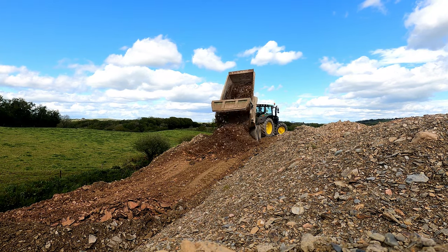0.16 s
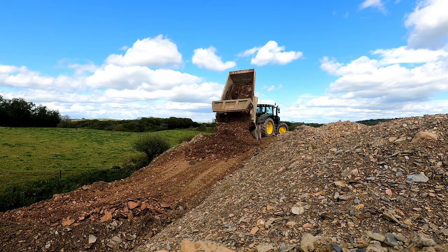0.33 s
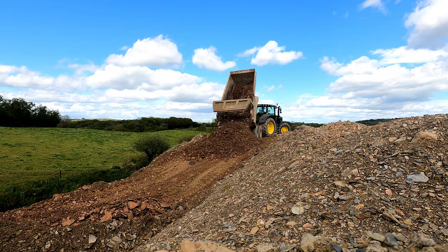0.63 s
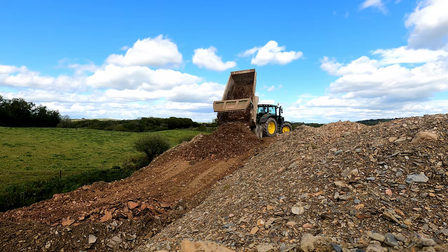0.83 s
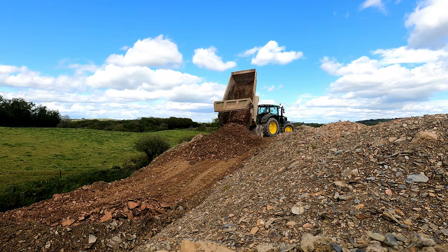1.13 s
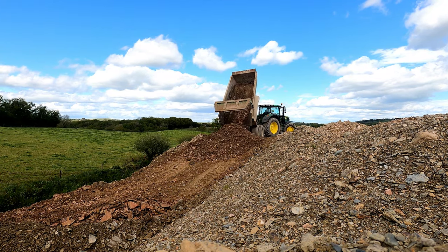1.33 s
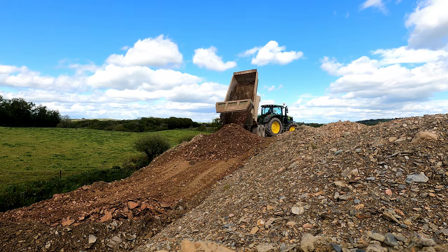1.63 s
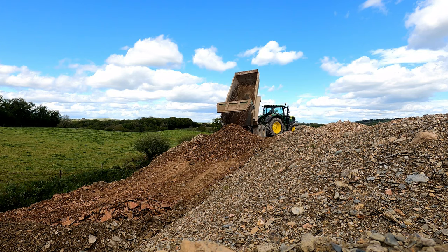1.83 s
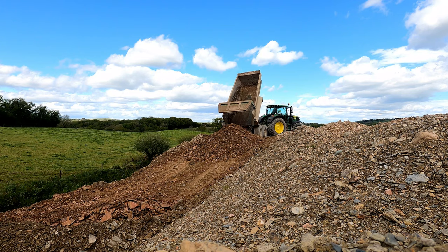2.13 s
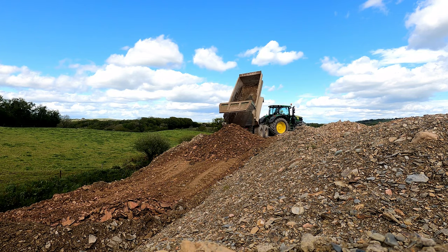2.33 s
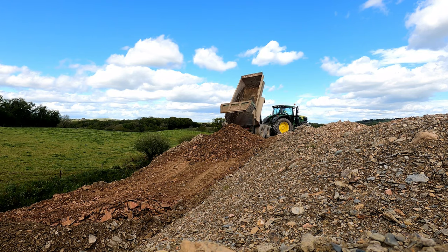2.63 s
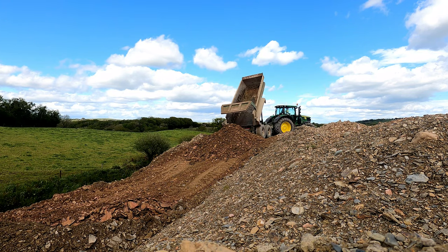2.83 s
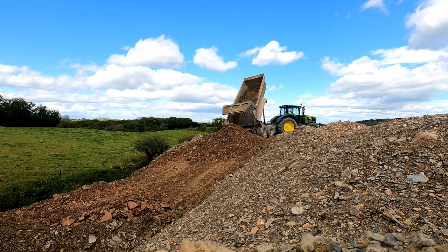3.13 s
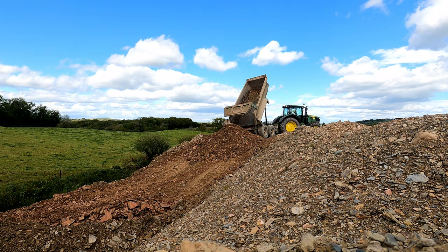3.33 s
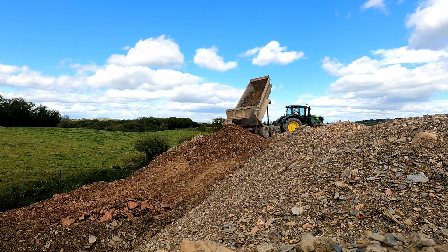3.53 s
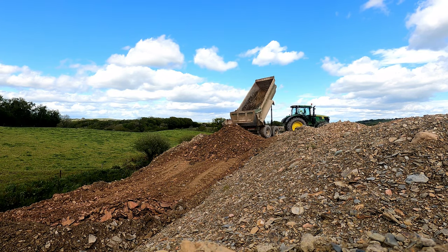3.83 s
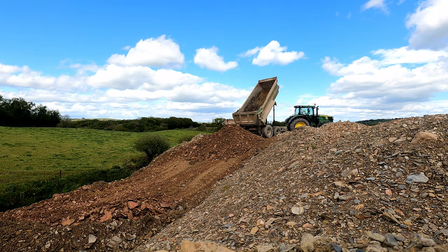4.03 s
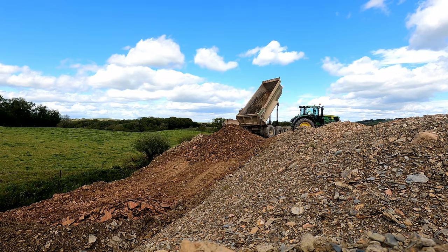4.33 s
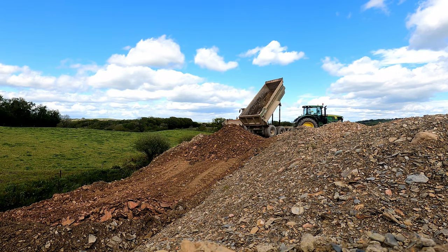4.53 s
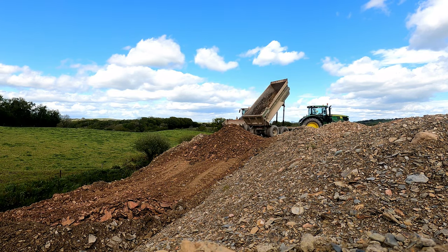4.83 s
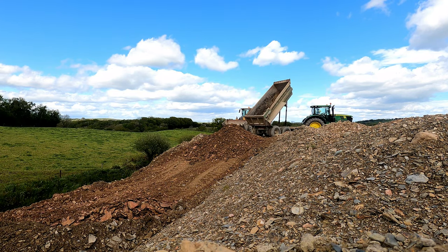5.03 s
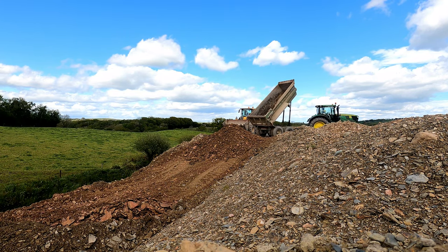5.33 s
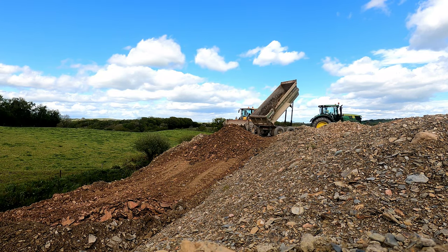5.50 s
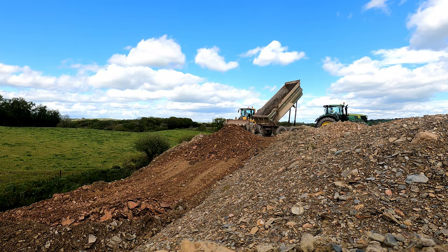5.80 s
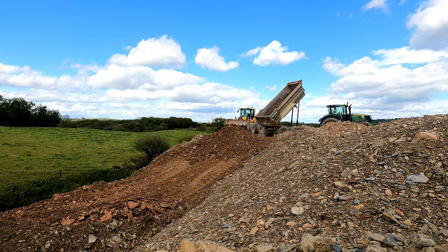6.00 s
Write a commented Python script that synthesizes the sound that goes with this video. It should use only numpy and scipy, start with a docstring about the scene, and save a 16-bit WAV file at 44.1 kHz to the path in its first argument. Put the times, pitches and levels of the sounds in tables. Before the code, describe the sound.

Outdoors, stones tumble from a tipping trailer over a diesel idle, thinning out before a short squeal, three ringing metal slams, rattles and rising engine revs.

```python
"""A spoil heap in the open: some way off, a raised steel trailer pours out the last of its rubble.
Stones are randomly struck resonances; hinge and idling tractor are sums of harmonics, the tractor with noise.
The trailer creeps forward, its hinge squeals and the gate slams three times, ringing the empty steel body.
Then the engine picks up and the trailer rattles. The image begins as a point ahead and opens out."""
import sys
import numpy as np
from scipy import signal
from scipy.fft import rfft, irfft, next_fast_len
from scipy.io import wavfile
from scipy.ndimage import uniform_filter1d, minimum_filter1d

SR = 44100
rng = np.random.default_rng(int(sys.argv[2]) if len(sys.argv) > 2 else 0)


def output_pcm(signal):
    """Save a mono or channel-first signal as 16-bit PCM at the path in sys.argv[1].

    Samples are clipped to [-1, 1] before scaling.
    """
    pcm = np.clip(np.atleast_2d(signal).T, -1, 1) * 32767
    wavfile.write(sys.argv[1], SR, np.round(pcm).astype(np.int16))


N = 271643
TIME = np.arange(N) / SR
BAND_HZ = 25 * 2 ** (np.arange(28) / 3)   # third-octave centres

# Flow of the load over the tail. Each row: time in seconds, level in dB.
FLOW = [(0, -1.5), (.7, -0.5), (1.2, -0.5), (1.75, -4.5), (2.25, -8), (2.8, -22), (3.25, -33)]
# Spectra of heavy stones, hard stones and fine grit. Each row: frequency in Hz, relative level in dB per Hz.
THUDS = [(90, 7), (130, 1), (190, -9), (250, 6), (340, 1), (480, 2.5), (660, 2.5), (800, -9), (1000, -6)]
CLACKS = [(850, 9), (1000, 0), (1250, 4), (1580, 8), (2000, 5.5), (2400, -1), (2950, -22), (3400, -17.5),
          (3900, -36)]
GRIT = [(2500, 3), (3400, -0.5), (4000, -9), (4800, -12), (6300, -14.5), (8000, -20.5), (10000, -28.5),
        (11300, -36.5), (12200, -47), (14500, -41)]
# Rocks landing, and now and then a small pebble ticking. Each row: start in seconds, level in dB, pitch in Hz,
# t60 in seconds.
ROCKS = [(.065, -26.5, 1700, 0.12), (.368, -27, 2300, 0.19), (.445, -24, 1500, 0.13),
         (.672, -21, 593, 0.12), (.792, -35, 6000, .05), (.845, -24, 1500, .1), (1.297, -26, 1890, 0.12),
         (1.345, -21.5, 750, 0.075), (1.545, -24, 790, 0.14), (1.565, -28, 1900, 0.11),
         (1.662, -22.5, 1590, 0.18), (1.684, -22, 650, 0.095), (1.835, -31, 1860, 0.16),
         (2.012, -29.5, 1830, 0.14), (2.118, -31, 1720, 0.35), (2.203, -32, 1800, 0.077),
         (2.25, -44, 2200, 0.1), (2.323, -33, 2100, 0.24), (2.42, -27.5, 1850, 0.14),
         (2.445, -39, 6000, .06), (2.563, -32.5, 2060, 0.17), (2.825, -39, 1800, .2),
         (2.995, -32, 1170, .15)]
# Boulders booming on the steel floor as they slide out. Each row: start in seconds, level in dB,
# pitch in Hz, t60 in seconds.
BOULDERS = [(.57, -18.5, 470, 0.14), (.672, -14.5, 340, 0.09), (.75, -22.5, 126, 0.32),
            (.81, -24, 245, 0.21), (.905, -23, 676, 0.24), (1.558, -1.5, 252, 0.066), (1.69, -23, 517, 0.1)]
THUD_DB, CLACK_DB = -26.5, -31.5   # before the flow level is added
GRIT_DB, CHURN_DB = -35.5, -31     # at the start; the fine stuff then thins out steadily
THINS_FROM_S, GRIT_DB_PER_S, CHURN_DB_PER_S = 0.47, 7, 6.5

# Tailgate blows, in three slams. Each row: start in seconds, level in dB, boom in dB, boom pitch in Hz,
# treble crack in dB, loss at each rebound in dB, side panels in dB, clang pitch in Hz, clang in dB,
# long ring of the body in dB.
SLAMS = [(3.383, -19.5, 5, 756, -11, 15.5, -10, 754, 5, 0.5),
         (3.390, -24, -2.5, 400, -1, 10.5, -4, 1850, 13.5, -4),
         (3.416, -23, 7.5, 300, -7, 10, -2.5, 2000, 11.5, 5.5),
         (3.465, -19.5, 8.5, 133, -4, 7.5, -3.5, 1750, 9, -1),
         (3.525, -29.5, 7, 320, -2, 12, -0.5, 1810, 15, -7),
         (3.63, -32.5, 20.5, 238, -8.5, 6.5, -6, 2090, 14, 6),
         (3.897, -21.5, 6.5, 427, -4.5, 9, -9.5, 677, 5, 10),
         (3.925, -31.5, 4.5, 739, -13, 11, -5, 684, 7.5, 0),
         (4.646, -17, -0.5, 141, 5.5, 1, 1, 3600, 5.5, -4), (4.66, -28, -0.5, 400, 5, 8, 1, 2400, 3, -2),
         (4.678, -18.5, 6, 240, -2.5, 11, 0, 2900, 3.5, 1),
         (4.706, -22.5, 10.5, 145, 3, 6.5, 6.5, 3400, 10, 3.5),
         (4.747, -20.5, 11.5, 140, 0, 5.5, 0, 1050, 5, 4), (4.775, -17, -3, 200, -3.5, 4, 7.5, 1150, 3, 5),
         (4.812, -19.5, 6, 127, 1, 12, 1, 1550, 5.5, -2), (4.835, -19, 5, 151, 2.5, 15, 1, 4400, 6.5, -5),
         (4.863, -24, -5, 300, 0, 17, 5.5, 3500, 0, -5),
         (4.934, -26.5, 4.5, 450, -6.5, 16, 6.5, 1090, 5, 7)]
# Dense ringing of the steel body. Each row: frequency in Hz, relative level in dB per Hz.
BODY = [(40, 9.5), (80, 7.5), (140, 4.5), (200, -4), (290, -1), (450, 3), (700, -3), (1050, -3.5),
        (1500, -15), (1950, -9), (2600, -14.5), (3600, -6.5), (4500, -26.5), (6000, -16.5), (8000, -85),
        (14000, -87)]
# How long that ringing lasts. Each row: frequency in Hz, t60 in seconds.
BODY_T60 = [(60, 0.38), (150, 0.97), (400, 0.59), (850, 0.63), (1270, 0.49), (1650, .38), (2000, 0.36),
            (4000, 0.095), (10000, .08)]
# Clearest modes of the body, then the gate's own. Each row: frequency in Hz, relative level in dB,
# t60 in seconds.
MODES_OF_BODY = [(122, -10, .65), (139, -11, .7), (153, -8.5, .75), (183, -19.5, 1.4), (248, -15, .9),
                 (291, -14, 1.05), (404, -16, 1.35), (472, -17, .9), (502, -20, 1.0), (590, -19, .8),
                 (651, -17, .6), (953, -20, .7), (1030, -21, .7), (1104, -24, .9), (1190, -26, .8),
                 (1355, -27, 1.1), (1513, -30, .9)]
MODES_OF_GATE = [(690, -10, .25), (835, -12, .22), (1050, -14, .2), (1330, -19, .2), (1630, -19, .2),
                 (1720, -21, .2), (1815, -18, .2), (1945, -20, .2), (2137, -18, .2), (2240, -20, .2),
                 (2380, -20, .18), (2500, -20, .2), (2620, -18, .18), (2800, -21, .18), (2945, -19, .16),
                 (3160, -21, .14), (3450, -19, .15), (3650, -19, .15), (3810, -21, .16), (4310, -26, .14),
                 (4490, -25, .16), (5330, -31, .14), (5750, -31, .14), (6230, -35, .12)]
# After each blow the gate rebounds, duller and boomier each time before the loss of level.
REBOUND_S, REBOUND_DULLS_DB, REBOUND_BOOM_DB = .034, 5.5, 3.5
BODY_HZ, BOOM_SINK = 142, 0.49   # the boom sinks towards this pitch; share of the interval lost per rebound
# The side panels ring in one range; where the gate lands decides which of its modes clang most.
PANEL_HZ, PANEL_OCTAVES, CLANG_OCTAVES = 1250, 0.2, 0.28

# Overtones of the hinge's squeal. Each row: frequency in Hz, level in dB.
HINGE = [(730, -2), (1460, -26), (2200, -15.5), (2950, -7), (3700, -16), (4400, -27), (5900, -31),
         (6600, -41), (8000, -39), (10000, -45), (15000, -60)]
# The squeal swells to a peak, holds briefly and dies away while its pitch sags.
SQUEAL_PEAK_S, SQUEAL_HOLD_S, SQUEAL_DB = 3.285, .018, -20
SQUEAL_RISE_DB_PER_S, SQUEAL_FALL_DB_PER_S = 800, 650
SQUEAL_HZ, SQUEAL_BEND_HZ, SQUEAL_BEND_S = 728, 14, .012

# Loudest rattles of drawbar and latches. Each row: start in seconds, level in dB, pitch in Hz, t60 in seconds.
RATTLES = [(3.552, -37, 1900, 0.11), (4.140, -36, 2550, 0.25), (5.122, -34.5, 1530, 0.13),
           (5.241, -30.5, 2360, 0.16), (5.246, -37.5, 1130, 0.47), (5.548, -40.5, 2530, 0.33),
           (5.755, -45, 2590, 0.12), (5.838, -38, 2400, 0.076), (5.9, -52, 2400, .12),
           (5.947, -28.5, 2930, 0.15), (5.971, -30.5, 1090, 0.37), (6.017, -23.5, 1040, 0.45),
           (6.024, -28, 2270, 0.18), (6.028, -27, 490, 0.17), (6.055, -24.5, 540, 0.22)]
# The drawbar's modes. Each row: frequency in Hz, relative level in dB, t60 in seconds.
MODES_OF_DRAWBAR = [(410, -3, .35), (497, 0, .35), (700, -7, .25), (1060, -5, .3), (1170, -4, .3),
                    (1340, -2, .3), (1440, -4, .25), (2010, -5, .18), (2330, -6, .16), (2640, -5, .16),
                    (2900, -8, .14), (3130, -8, .14), (3560, -10, .12)]
# Clinks of pins and chain. Each row: start in seconds, level in dB, pitch in Hz, t60 in seconds.
CLINKS = [(3.467, -43, 6040, 0.14), (3.549, -28.5, 3380, 0.07), (4.098, -44, 3780, 0.066),
          (4.158, -36, 3930, 0.073)]
# Gravel crunching under the tyres. Each row: start in seconds, level in dB, pitch in Hz, t60 in seconds.
CRUNCHES = [(5.06, -48, 4100, 0.28), (5.095, -47, 5653, 0.096), (5.32, -51, 3990, .15),
            (5.5, -55, 5200, .3), (5.565, -45, 3600, .12), (5.7, -45, 3300, 0.11), (5.825, -46, 4670, 0.12),
            (5.943, -41, 4800, 0.09), (6.07, -42.5, 4750, .03)]

# The diesel's speed. Each row: time in seconds, firings per second.
SPEED = [(0, 35.4), (3.1, 35.3), (3.48, 33.8), (3.9, 36.0), (4.5, 34.9), (5.0, 34.8), (5.35, 32.9),
         (5.69, 35.7), (5.78, 37.3), (5.92, 40.5), (6.16, 45.9)]
# Higher exhaust orders. Each row: multiple of the firing rate, level in dB.
OVERTONES = [(1.5, -39), (2.5, -51.5), (3, -58), (3.5, -46.5), (4, -50.5), (5, -65)]
# The exhaust note sinks and recovers during the pour. Each row: time in seconds, level in dB.
EXHAUST_LEVEL = [(.5, 0.5), (1.25, -13), (1.7, -1), (3.3, -0.5), (4.2, -4), (4.7, 0.5), (5.3, -0.5)]
# Spectra of low rumble and of clatter. Each row: frequency in Hz, relative level in dB per Hz.
RUMBLE = [(20, -10.5), (35, 5.5), (52, -1.5), (80, -4.5), (130, -5.5), (190, -9), (320, -17.5), (600, -30)]
CLATTER = [(250, 9.5), (370, -1.5), (475, 6), (600, 7), (1000, 3), (1400, 1.5), (1800, -3.5), (2700, -7.5),
           (3600, -9.5), (4400, -17), (6200, -24.5), (8000, -37), (14000, -46.5)]
# The rumble is strong under the pour and while the trailer creeps forward.
# Each row: time in seconds, level in dB.
RUMBLE_LEVEL = [(0, -42), (.8, -23.5), (2.7, -35), (3.8, -24.5), (4.6, -28.5), (5.3, -46.5), (5.85, -35.5)]
# Changes in the engine's clatter. Each row: time in seconds, level in dB.
CLATTER_LEVEL = [(3.0, -0.5), (3.85, 1), (4.35, -1), (4.47, 1), (5.3, 2.5), (5.6, -2), (5.85, 2)]
# Engine at idle: firing rate, then levels of firing tone, octave and clatter before their own curves.
IDLE_HZ, TONE_DB, OCTAVE_DB, CLATTER_DB = 35.48, -28.5, -32, -44
# Change for each extra firing per second.
TONE_DB_PER_HZ, OCTAVE_DB_PER_HZ, CLATTER_DB_PER_HZ = 2, -0.1, 0.9
FULL_EFFORT_HZ = 38.5   # effort stops rising above this firing rate

# The image is a point at first and then opens. Each row: time in seconds, level of the side signal in dB.
WIDTH = [(0, -64), (3.55, -56), (3.9, -21.5), (4.2, -16.5), (4.7, -14), (6.16, -8.5)]
CUTOFF_HZ = 16000


def rubble(surge_db=1.5, run_out_db_per_s=45):
    """The load slides off the floor and tumbles onto the heap, in small surges."""
    flow_db, = in_time(FLOW)
    thinning_s = np.maximum(TIME - THINS_FROM_S, 0)
    run_out_s = np.maximum(TIME - FLOW[-1][0], 0)
    surges = from_db(surge_db * drift(2.6) - run_out_db_per_s * run_out_s)

    thuds = coloured(grains(per_s=900, low_hz=122.0, high_hz=970, cycles=5.3, spread_db=1.5), THUDS)
    clacks = coloured(grains(per_s=900, low_hz=804, high_hz=3600, cycles=7.2, spread_db=0.0), CLACKS)
    coarse = from_db(flow_db) * (from_db(THUD_DB) * thuds + from_db(CLACK_DB) * clacks)

    grit = coloured(grains(per_s=4000, low_hz=2110, high_hz=12000, cycles=7, spread_db=-0.9), GRIT)
    churn = coloured(rng.standard_normal(N), CLATTER)   # gravel, with the same spectrum as the clatter
    fine = from_db(GRIT_DB - GRIT_DB_PER_S * thinning_s) * grit
    fine += from_db(CHURN_DB - CHURN_DB_PER_S * thinning_s) * churn

    rocks = knocks(ROCKS, width_octaves=0.78, rise_s=0.0079, top_hz=8050, tail_db=-39)
    boulders = knocks(BOULDERS, width_octaves=0.41, rise_s=0.011, top_hz=3000, tail_db=-42)
    return surges * (coarse + fine) + rocks + boulders


def tailgate(boom_octaves=0.69, knee_hz=850, treble_hz=2300, build_cycles=0.85, contact_s=0.011,
             judder_db=2, modes_db=-3, strike_db=-2, strike_t60=0.023, strike_rise_s=.003,
             top_hz=9000, air_hz=7600):
    """Each blow rings the steel body: the gate clangs in beating pairs of modes, the boom builds and lasts."""
    columns = np.transpose(rebounds(count=4))
    times, level_db, boom_db, boom_hz, crack_db, panel_db, clang_hz, clang_db, ring_db = columns
    crack_curve = [(knee_hz, 0), (treble_hz, 1), (2 * treble_hz, 1), (top_hz, .2)]

    def force_db(hz):
        """Strength of every blow at one frequency."""
        boom = boom_db * bump(hz, boom_hz, boom_octaves)
        panels = panel_db * bump(hz, PANEL_HZ, PANEL_OCTAVES)
        return level_db + boom + panels + crack_db * at_hz(crack_curve, hz)

    # Dense ringing: the power envelope of each band shapes a band of noise.
    out, bite = np.zeros(N), np.exp(-1 / (strike_rise_s * SR))
    for hz, share in zip(BAND_HZ, shares(at_hz(BODY, BAND_HZ))):
        keep, keep_strike = from_db(-120 / (np.array([at_hz(BODY_T60, hz), strike_t60]) * SR))
        build = np.exp(-1 / ((contact_s + build_cycles / hz) * SR))
        blows = clicks(times, from_db(force_db(hz)) ** 2)
        boom = signal.lfilter([1], [1, -keep], blows)
        boom = signal.lfilter([1 - build], [1, -build], boom)
        strike_power = from_db(strike_db) ** 2 * hz / (hz + knee_hz)
        strike = signal.lfilter([strike_power], [1, -keep_strike], blows)
        strike = signal.lfilter([1 - bite], [1, -bite], strike)
        out += share * np.sqrt(boom + strike) * noise_band(hz)
    out *= from_db(judder_db * drift(49))   # the loose gate chatters on its frame

    for hz, mode_db, t60 in MODES_OF_BODY:
        uneven_db = rng.normal(0, 1.5, len(times))
        strengths = from_db(force_db(hz) + modes_db + ring_db + mode_db + uneven_db)
        out += ring(clicks(times, strengths * rng.choice([-1, 1], len(times))), hz, t60)
    for hz, mode_db, t60 in MODES_OF_GATE:
        clang = clang_db * bump(hz, clang_hz, CLANG_OCTAVES)
        for twin_hz in (hz * .994, hz * 1.006):
            uneven_db = rng.normal(0, 1.5, len(times))
            strengths = from_db(force_db(hz) + clang + mode_db - 3 + uneven_db)
            late_s = rng.uniform(0, .0035, len(times))
            out += ring(clicks(times + late_s, strengths), twin_hz, t60)
    return signal.sosfilt(signal.butter(4, min(air_hz, SR / 3), fs=SR, output="sos"), out)


def rebounds(count):
    """Each blow and its ever weaker, duller returns, as rows like SLAMS without the loss per rebound."""
    kept = np.clip(1 - BOOM_SINK, 0, 1)
    rows = []
    for s, db, boom_db, hz, crack_db, loss_db, *colour, ring_db in SLAMS:
        for k in range(count):
            boom_hz = BODY_HZ * (hz / BODY_HZ) ** (kept ** k)
            rows.append((s + k * REBOUND_S, db - k * loss_db, boom_db + k * REBOUND_BOOM_DB, boom_hz,
                         crack_db - k * REBOUND_DULLS_DB, *colour, ring_db - k * REBOUND_BOOM_DB))
    return rows


def hinge(panel_hz=1470, panel_t60=0.15, panel_db=16, panel_lag_s=0.018, floor_db=-15, floor_lag_s=.04,
          wall_db=-12, wall_lag_s=0.029, wall_hz=850, rasp_db=3):
    """The dry pin sticks and slips unevenly; a panel answers near its octave, floor and far wall echo it."""
    age = TIME - SQUEAL_PEAK_S
    hz = SQUEAL_HZ + SQUEAL_BEND_HZ * (1 - np.tanh(age / SQUEAL_BEND_S)) / 2
    rise_db = SQUEAL_RISE_DB_PER_S * age
    fall_db = -SQUEAL_FALL_DB_PER_S * np.maximum(age - SQUEAL_HOLD_S, 0)
    level_db = SQUEAL_DB + np.minimum(rise_db, fall_db)
    uneven_hz = hz * (1 + .017 * drift(400) + .004 * drift(110))
    phase = 2 * np.pi * np.cumsum(uneven_hz) / SR
    tone = np.zeros(N)
    for k in range(1, 21):
        rasp = rasp_db * min(k / 4, 1) * drift(90)
        tone += from_db(at_hz(HINGE, k * SQUEAL_HZ) + rasp) * np.sin(k * phase)
    squeal = tone * from_db(level_db)
    panel = ring(squeal + 1e-18, panel_hz, panel_t60) * 2 * np.log(1000) / (panel_t60 * SR)
    # The wall's echo is duller than the floor's.
    dulled = signal.sosfilt(signal.butter(2, wall_hz, fs=SR, output="sos"), squeal + 1e-18)
    off_panel = echo(panel, panel_lag_s, panel_db)
    off_floor = echo(squeal, floor_lag_s, floor_db)
    off_wall = echo(dulled, wall_lag_s, wall_db)
    return squeal + off_panel + off_floor + off_wall


def loose_stones(level_db=-13, settle_t60=0.18, spread_db=3):
    """Stones left in the body jump at each hard blow and clatter on the steel until they settle."""
    times, blow_db, _, _, crack_db, *_ = np.transpose(SLAMS)
    keep = from_db(-120 / (settle_t60 * SR))
    kicks = clicks(times, from_db(blow_db + crack_db + level_db) ** 2)
    shaking = np.sqrt(signal.lfilter([1], [1, -keep], kicks))
    return shaking * grains(per_s=1100, low_hz=1550, high_hz=3750, cycles=69, spread_db=spread_db)


def drawbar(ring_db=-5, reach_octaves=0.81):
    """Each rattle is a flurry of contacts that rings the drawbar's modes near its own pitch."""
    times, level_db, pitch_hz, _ = np.transpose(RATTLES)
    out = from_db(-3.0) * knocks(RATTLES, width_octaves=1.34, rise_s=0.0047, top_hz=3400, tail_db=-25.0)
    for hz, mode_db, t60 in MODES_OF_DRAWBAR:
        uneven_db = rng.normal(0, 2, len(times))
        strengths = from_db(level_db + ring_db + mode_db + uneven_db) * bump(hz, pitch_hz, reach_octaves)
        out += ring(clicks(times, strengths * rng.choice([-1, 1], len(times))), hz, t60)
    return out


def pins_and_chain():
    """Small hard steel parts clink: knocks in a very narrow resonance."""
    return knocks(CLINKS, width_octaves=0.065, rise_s=0.0055, top_hz=9000, tail_db=-39.5)


def tyres_on_gravel():
    """Gravel crunches under the tyres: soft-edged knocks in a broad, high resonance."""
    return knocks(CRUNCHES, width_octaves=0.65, rise_s=.012, top_hz=6700, tail_db=-38)


def engine(throb=0.048, wobble_db=3.5):
    """Exhaust orders on the firing rate, with rumble, and clatter that swells slightly at each firing."""
    (rate,), (rumble_db,) = in_time(SPEED), in_time(RUMBLE_LEVEL)
    (exhaust_db,), (clatter_db,) = in_time(EXHAUST_LEVEL), in_time(CLATTER_LEVEL)
    effort_hz = np.minimum(rate, FULL_EFFORT_HZ) - IDLE_HZ
    phase = 2 * np.pi * np.cumsum(rate) / SR
    firing_db = TONE_DB + TONE_DB_PER_HZ * effort_hz + wobble_db / 2 * drift(0.63)
    octave_db = OCTAVE_DB + OCTAVE_DB_PER_HZ * effort_hz + wobble_db * drift(11.4)
    tone = from_db(firing_db) * np.cos(phase) + from_db(octave_db) * np.cos(2 * phase)
    tone *= from_db(exhaust_db)
    for multiple, level_db in OVERTONES:
        uneven_db = 3 * drift(4)
        order = round(2 * multiple) / 2
        tone += from_db(level_db + uneven_db) * np.cos(order * phase + rng.uniform(0, 2 * np.pi))
    rumble = from_db(rumble_db) * coloured(rng.standard_normal(N), RUMBLE)
    clatter = coloured(rng.standard_normal(N), CLATTER) * (1 + throb * np.cos(phase))
    clatter *= from_db(CLATTER_DB + clatter_db + CLATTER_DB_PER_HZ * effort_hz)
    return np.sqrt(2) * tone + rumble + clatter   # the root of 2 makes tone levels rms


def knocks(rows, width_octaves, rise_s, top_hz, tail_db):
    """Each knock is a flurry of contacts in one resonance, dulled by distance, with a weak longer tail."""
    out = np.zeros(N)
    dull = signal.butter(5, min(top_hz, SR / 3), fs=SR, output="sos")
    age = TIME[:SR]
    for s, level_db, hz, t60 in rows:
        start = int(s * SR)
        edges = np.minimum(hz * 2 ** (np.array([-.5, .5]) * width_octaves), SR / 3)
        resonance = signal.butter(2, edges, "band", fs=SR, output="sos")
        flurry = signal.sosfilt(resonance, rng.standard_normal(len(age)))
        flurry = rms_one(signal.sosfilt(dull, flurry))
        fade = from_db(-60 * age / t60) + from_db(tail_db - 20 * age / t60)
        fade *= 1 - np.exp(-age / rise_s)
        out[start:start + len(age)] += (from_db(level_db) * fade * flurry)[:N - start]
    return out


def grains(per_s, low_hz, high_hz, cycles, spread_db):
    """Stones collide at random, each ringing for a few or many cycles at one of 16 pitches; rms 1."""
    count = 16
    sizes = from_db(spread_db * np.minimum(rng.exponential(1, N), 4)) * rng.choice([-1, 1], N)
    hits = sizes * (rng.random(N) < per_s / SR)
    dealt = rng.integers(0, count, N)
    out = np.zeros(N)
    for k, hz in enumerate(np.geomspace(low_hz, min(high_hz, SR / 3), count)):
        out += ring(hits * (dealt == k) + 1e-18, hz, cycles / hz) * hz
    return rms_one(out)


def ring(x, hz, t60):
    """A unit click sets a decaying sine of height 1 ringing."""
    r, w = from_db(-60 / (t60 * SR)), 2 * np.pi * hz / SR
    return signal.lfilter([0, np.sin(w)], [1, -2 * r * np.cos(w), r * r], x)


def clicks(times, heights):
    """One click at each time."""
    out = np.zeros(N)
    np.add.at(out, np.clip(np.round(times * SR).astype(int), 0, N - 1), heights)
    return out + 1e-18


def echo(x, delay_s, level_db):
    """A delayed copy at its own level."""
    return from_db(level_db) * np.interp(TIME - delay_s, TIME, x, left=0)


def noise_band(hz):
    """A third of an octave of noise, rms 1."""
    edges = hz * 2 ** (np.array([-1, 1]) / 6)
    band = signal.butter(2, edges, "band", fs=SR, output="sos")
    return rms_one(signal.sosfilt(band, rng.standard_normal(N)))


def coloured(x, spectrum):
    """Give a steady sound a spectrum that falls away steeply past its ends; rms 1."""
    size = next_fast_len(N)
    hz = np.maximum(np.arange(size // 2 + 1) * SR / size, 1)
    skirts = np.minimum(1, np.minimum(hz / spectrum[0][0], spectrum[-1][0] / hz)) ** 4
    return rms_one(irfft(rfft(x, size) * from_db(at_hz(spectrum, hz)) * skirts, size)[:N])


def shares(db_per_hz):
    """Band gains of unit total power."""
    gains = from_db(db_per_hz) * np.sqrt(BAND_HZ)
    return gains / np.linalg.norm(gains)


def drift(rate):
    """Slow chance with spread 1, drawn every 40 samples; rate in Hz."""
    r = np.exp(-80 * np.pi * rate / SR)
    slow = signal.lfilter([1], [1, -2 * r, r * r], rng.standard_normal(N // 40 + 2002))
    slow = slow[2000:]   # drop the settling-in
    return np.interp(np.arange(N) / 40, np.arange(len(slow)), rms_one(slow))


def bump(hz, centre_hz, octaves):
    """A bell of height 1 on a log-frequency axis."""
    return np.exp(-(np.log2(hz / centre_hz) / octaves) ** 2 / 2)


def at_hz(points, hz):
    """Read a table on a log-frequency axis."""
    table_hz, values = np.array(points)[:, 0], np.array(points)[:, 1]
    return np.interp(np.log(hz), np.log(table_hz), values)


def in_time(rows):
    """Each column of a curve, sample by sample."""
    s, *columns = np.transpose(rows)
    return [np.interp(TIME, s, c) for c in columns]


def from_db(db):
    """Decibels to gain."""
    return 10 ** (np.asarray(db) / 20)


def rms_one(x):
    """Scale to unit power."""
    return x / np.sqrt(np.mean(x ** 2) + 1e-20)


def scene():
    """The open steel box flutters between its walls; all lies straight ahead, with some spread in the treble."""
    trailer = rubble() + tailgate() + loose_stones() + drawbar() + pins_and_chain() + tyres_on_gravel()
    across_s = .0067
    once = echo(trailer, across_s, level_db=-30.0)
    twice = echo(trailer, 2 * across_s, level_db=-18.5)
    mid = trailer + once + twice + hinge() + engine()
    treble = signal.sosfilt(signal.butter(1, 1800, "high", fs=SR, output="sos"), mid)
    side = echo(treble, delay_s=0.0034, level_db=in_time(WIDTH)[0])
    return np.array([mid + side, mid - side])


def record(dry, release_db_per_s=40):
    """Behind the microphone a limiter holds the slams down and recovers slowly; the top is cut."""
    ceiling_db = -2.8
    over_db = np.maximum(20 * np.log10(np.abs(dry).max(axis=0) + 1e-9) - ceiling_db, 0)
    release_db = release_db_per_s * TIME
    held_db = np.maximum.accumulate(over_db + release_db) - release_db
    gain_db = uniform_filter1d(minimum_filter1d(-held_db, size=129), size=129)
    top_cut = signal.cheby2(12, 70, CUTOFF_HZ, fs=SR, output="sos")
    return signal.sosfilt(top_cut, dry * from_db(gain_db))


dry = scene()
out = record(dry)
output_pcm(out)
```